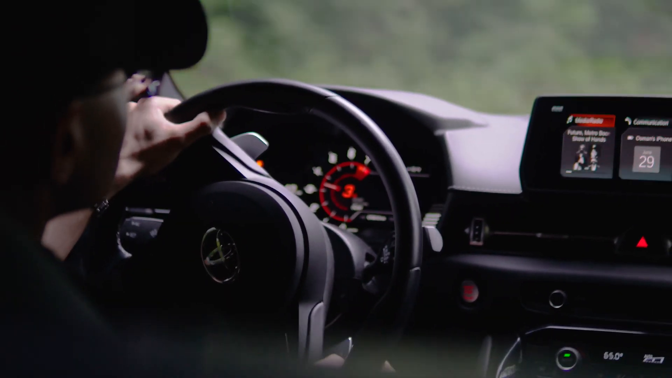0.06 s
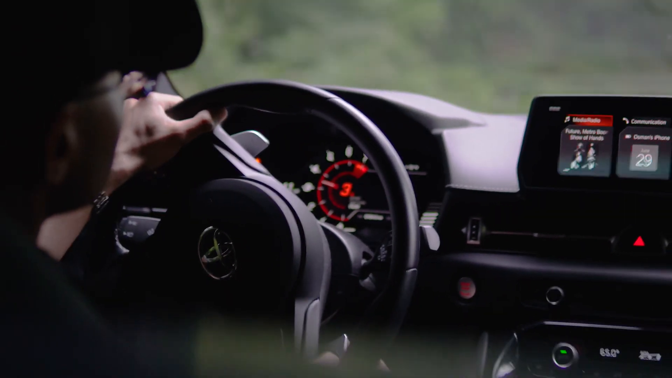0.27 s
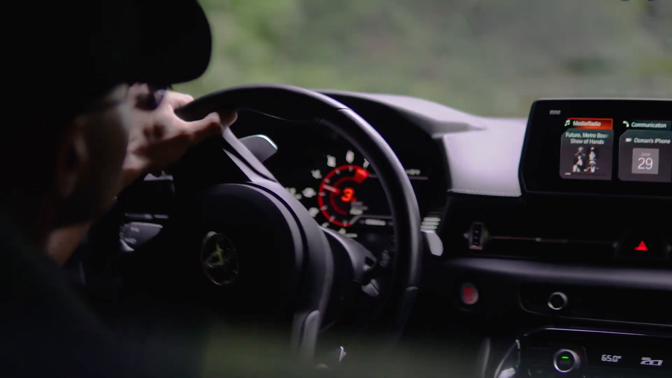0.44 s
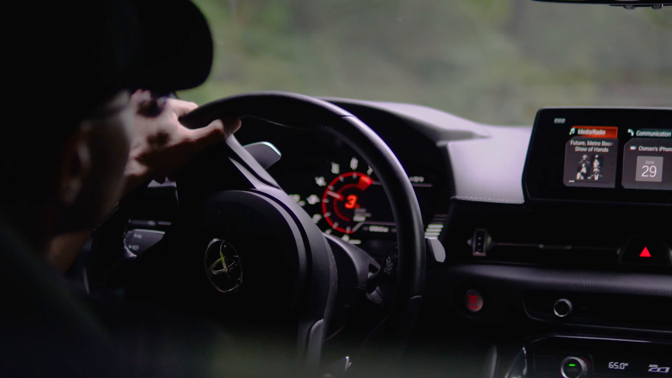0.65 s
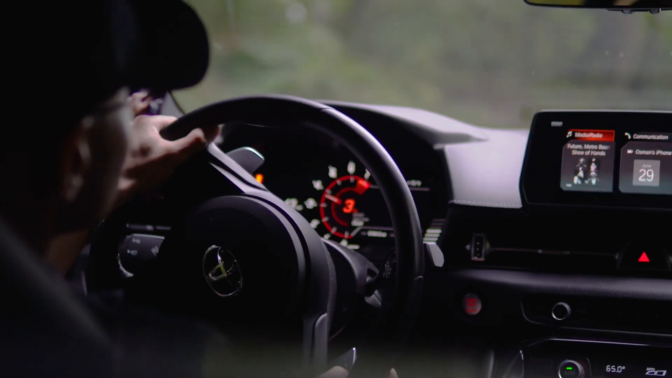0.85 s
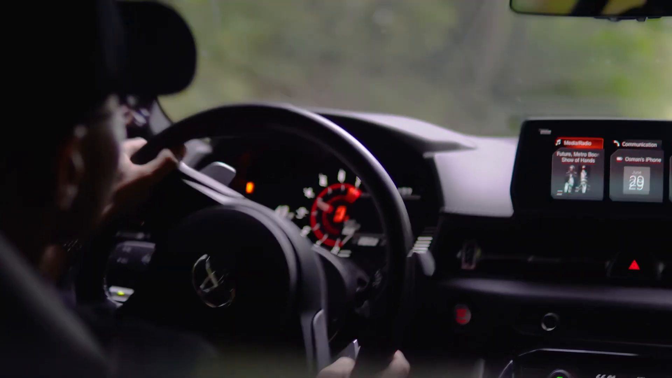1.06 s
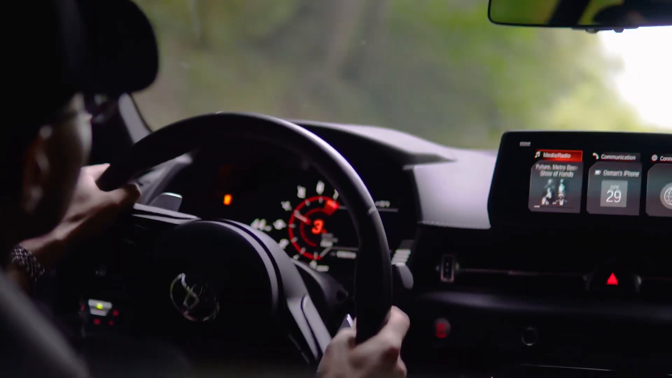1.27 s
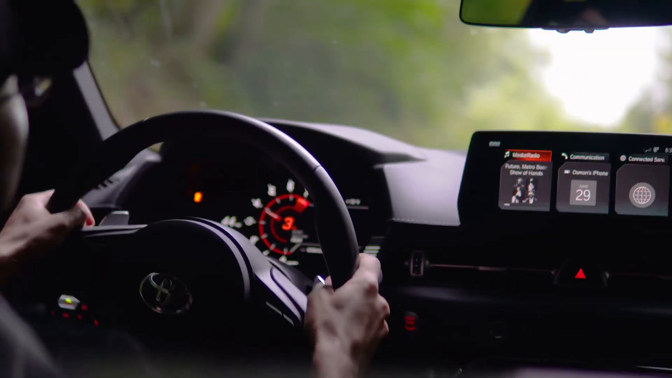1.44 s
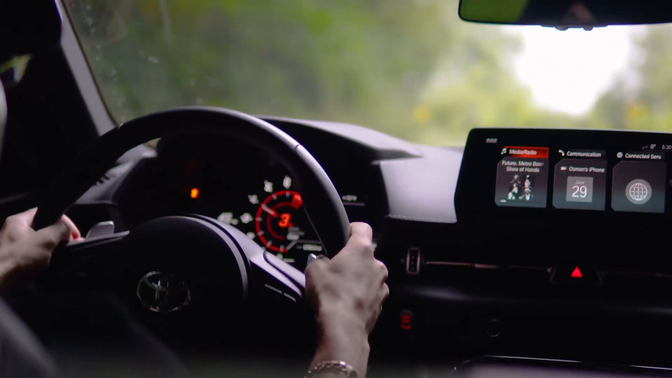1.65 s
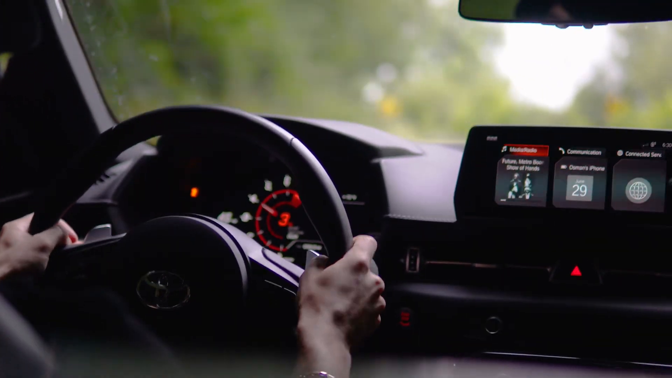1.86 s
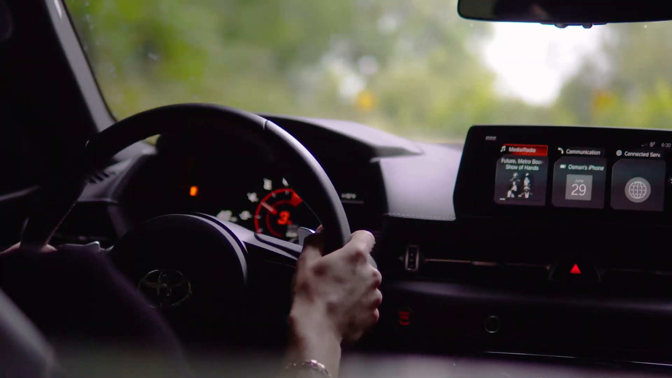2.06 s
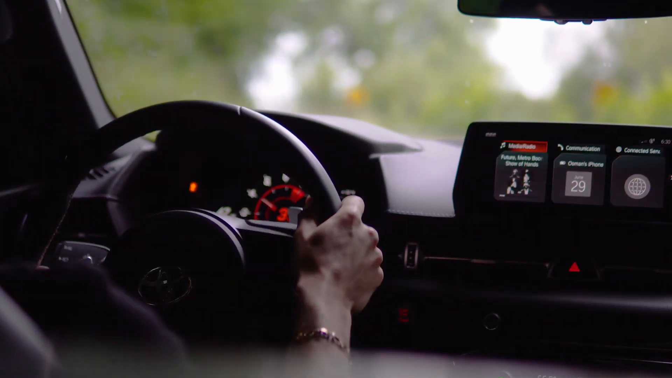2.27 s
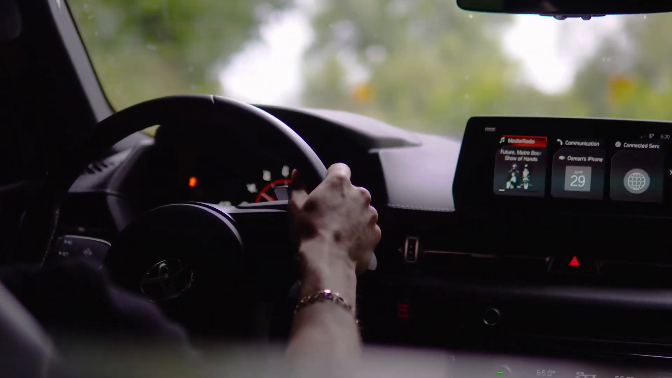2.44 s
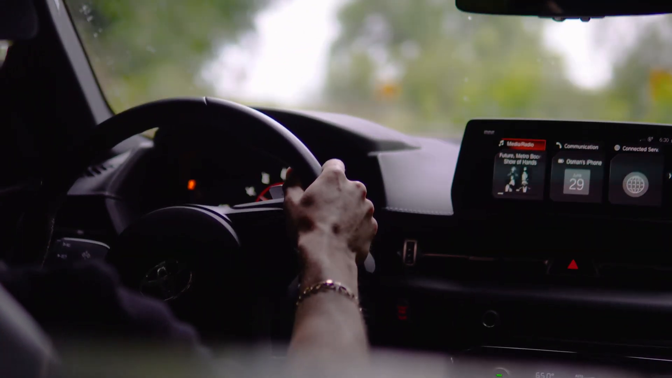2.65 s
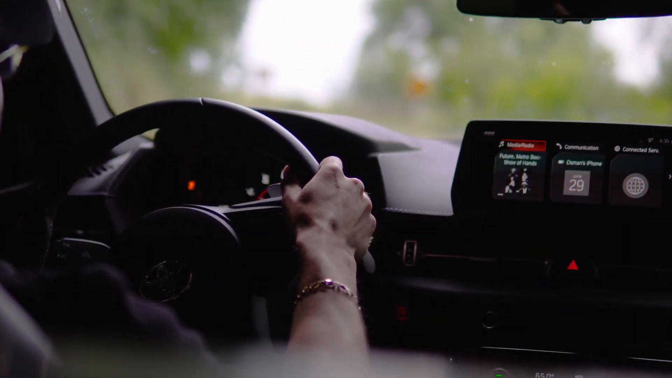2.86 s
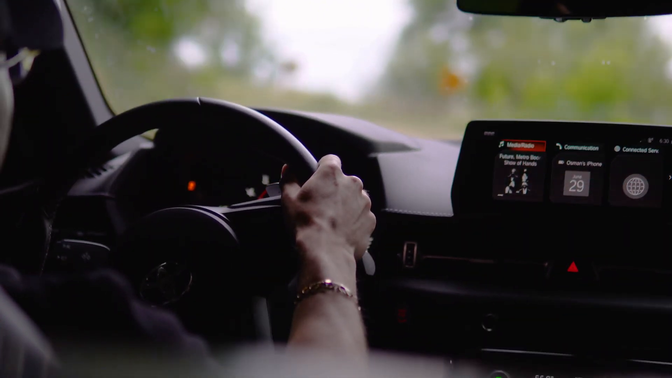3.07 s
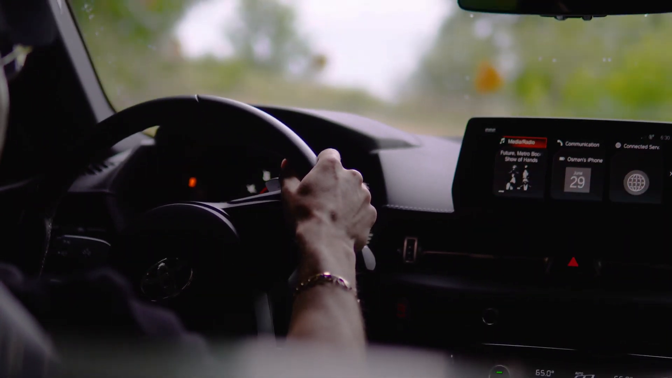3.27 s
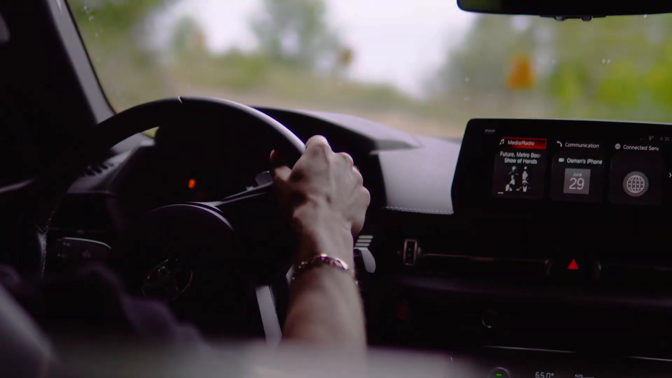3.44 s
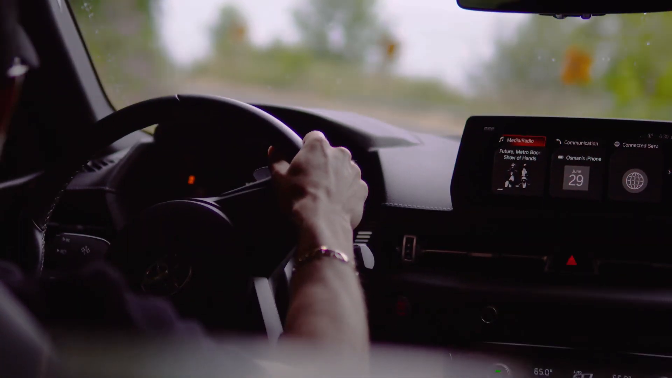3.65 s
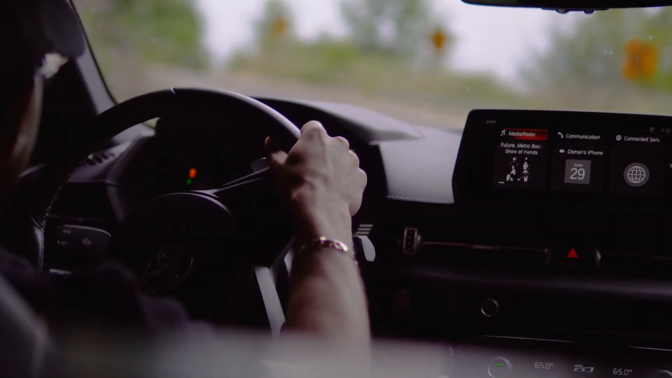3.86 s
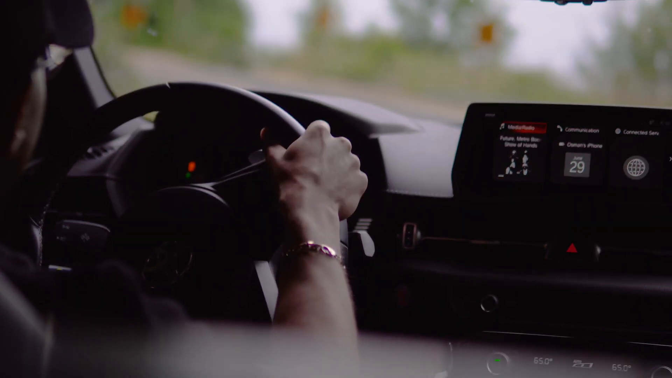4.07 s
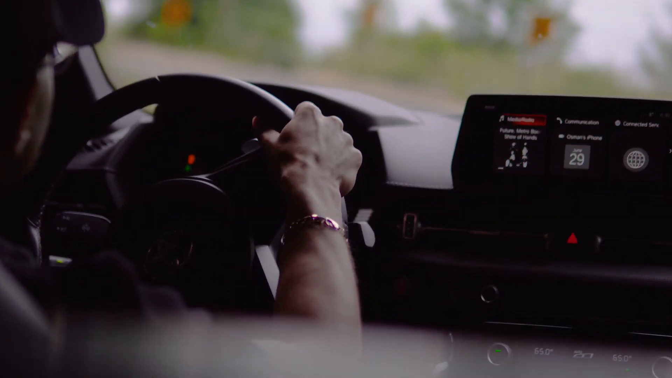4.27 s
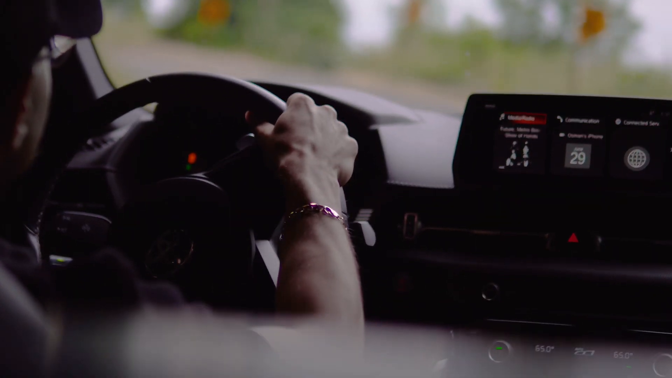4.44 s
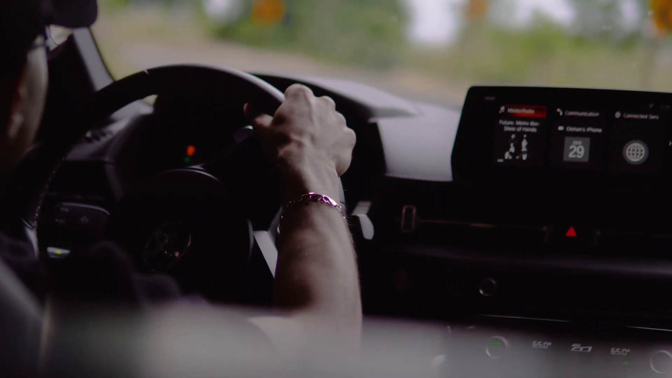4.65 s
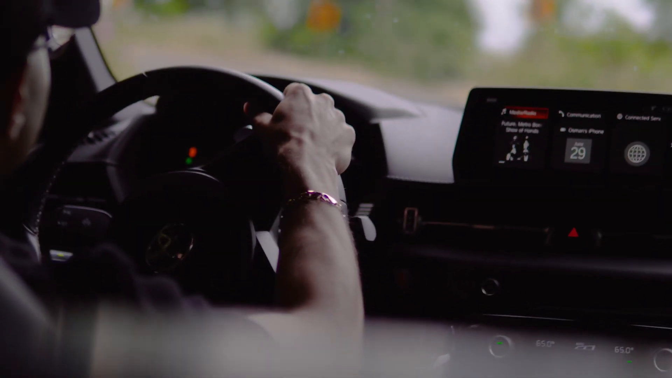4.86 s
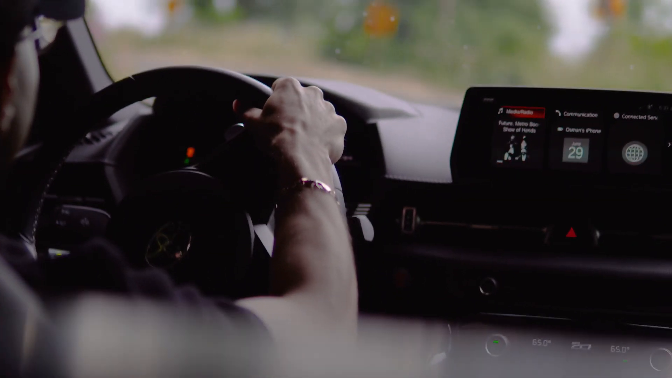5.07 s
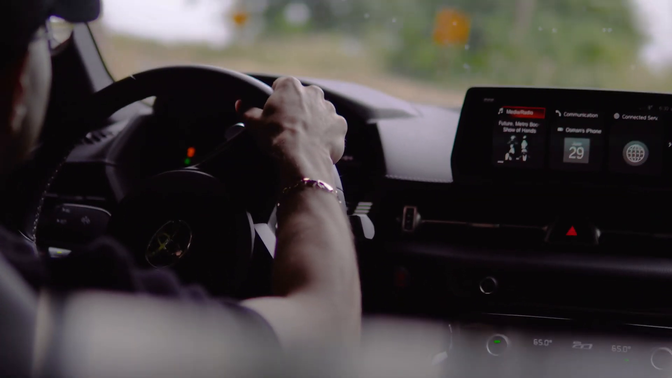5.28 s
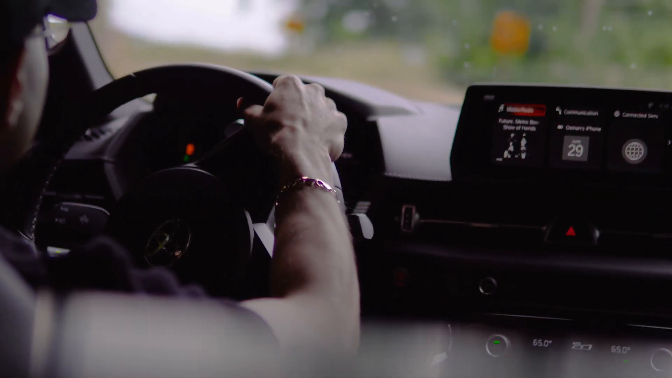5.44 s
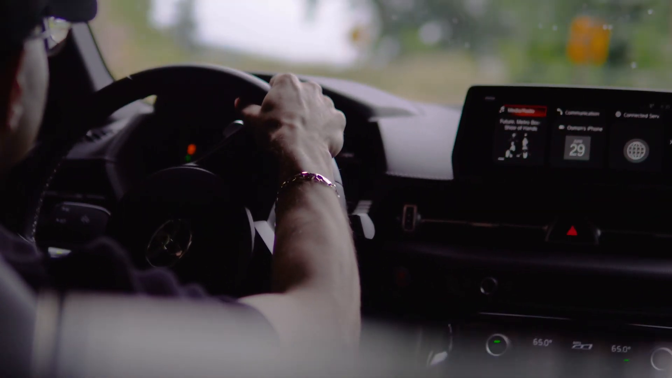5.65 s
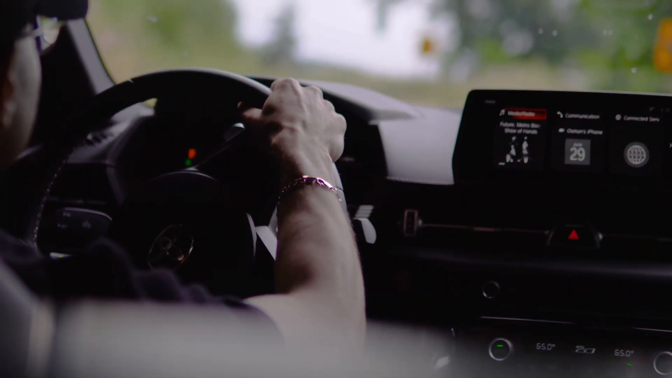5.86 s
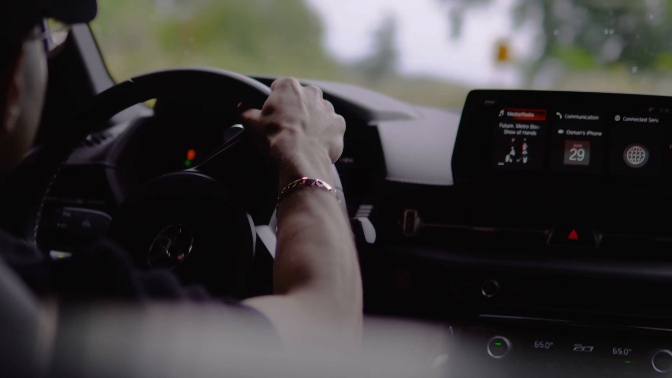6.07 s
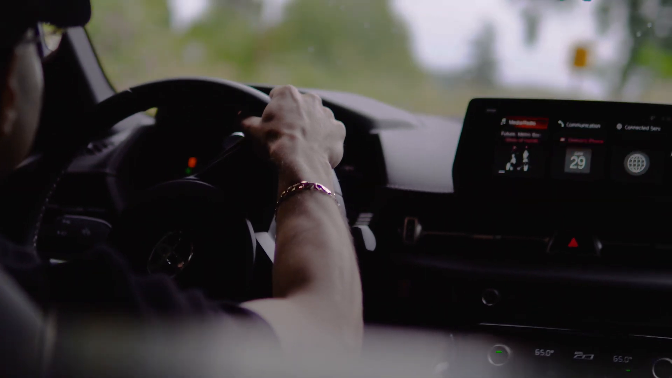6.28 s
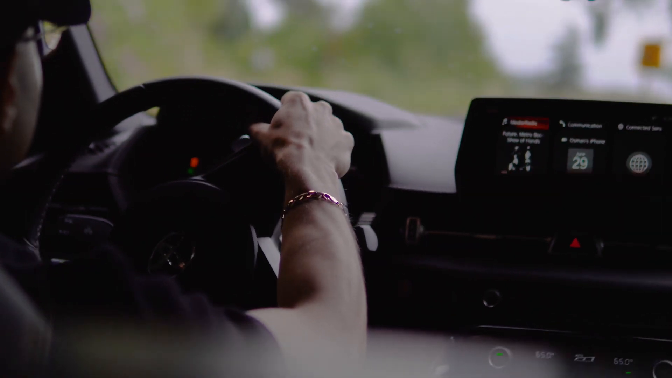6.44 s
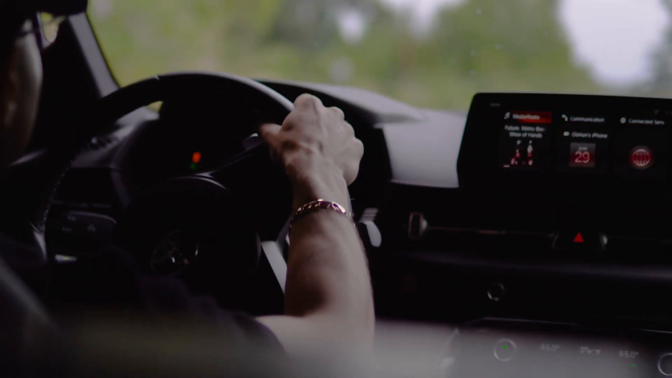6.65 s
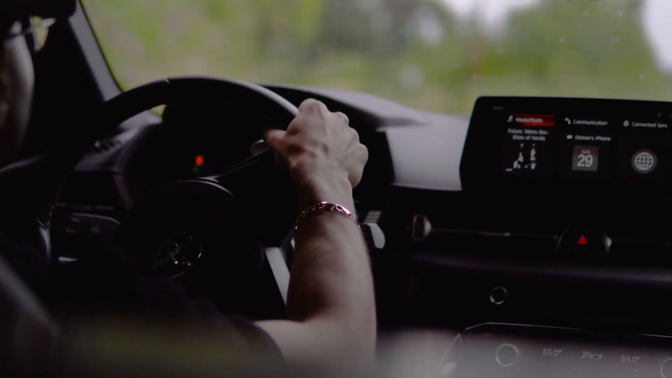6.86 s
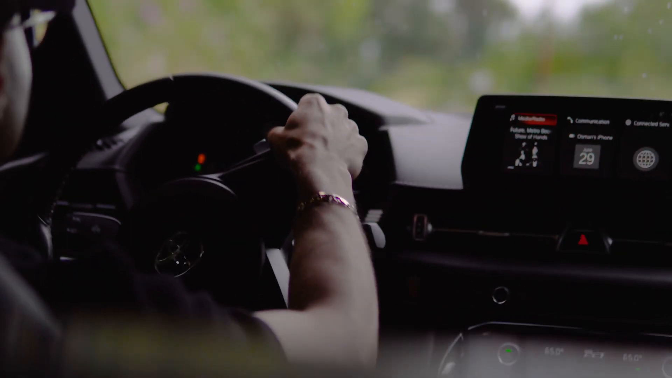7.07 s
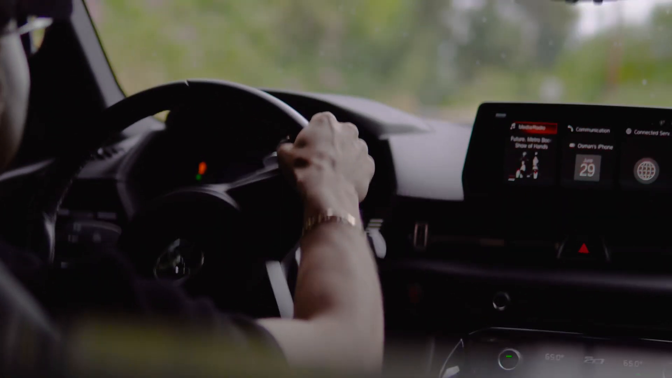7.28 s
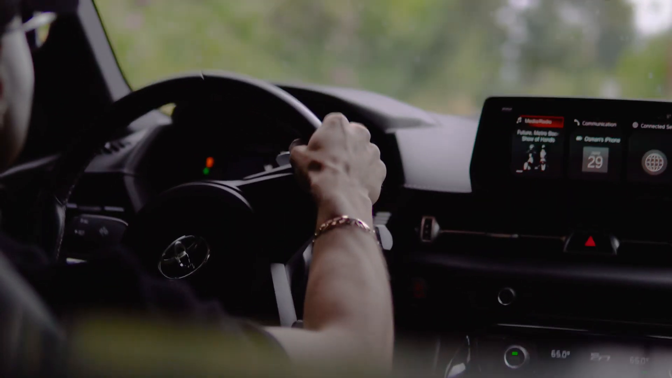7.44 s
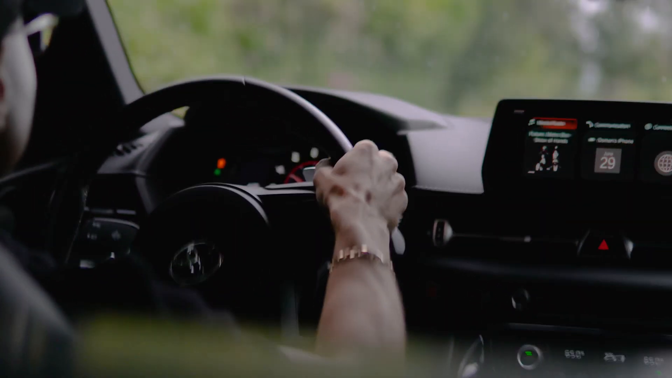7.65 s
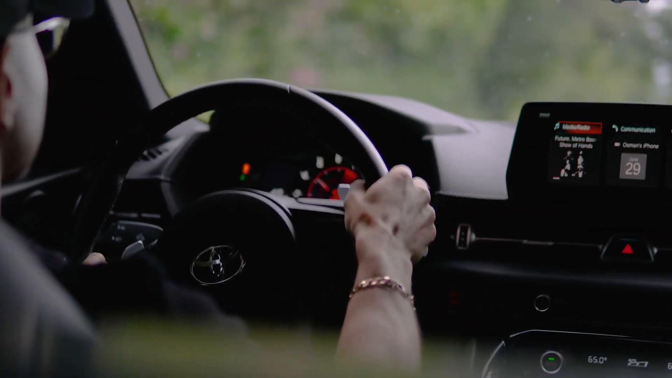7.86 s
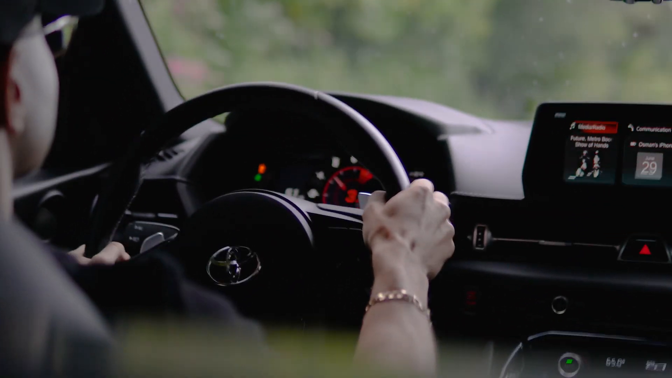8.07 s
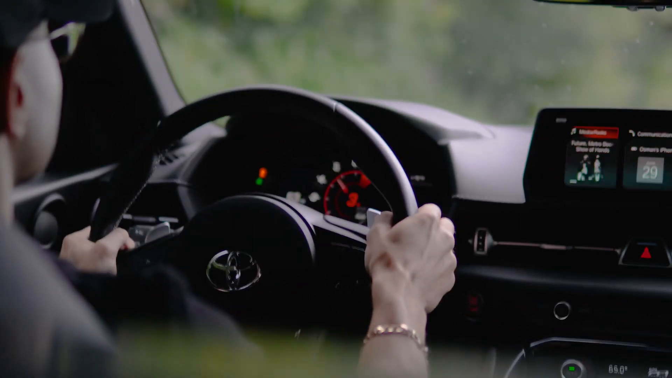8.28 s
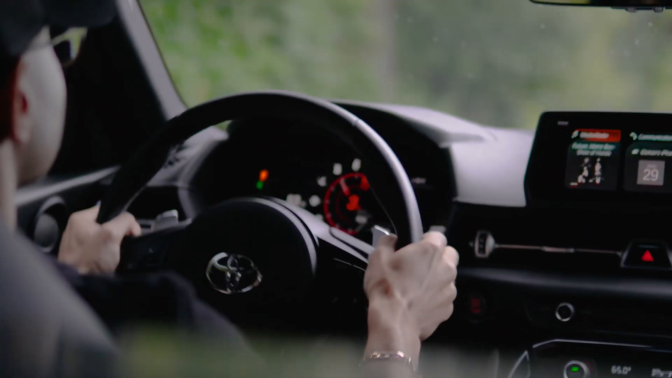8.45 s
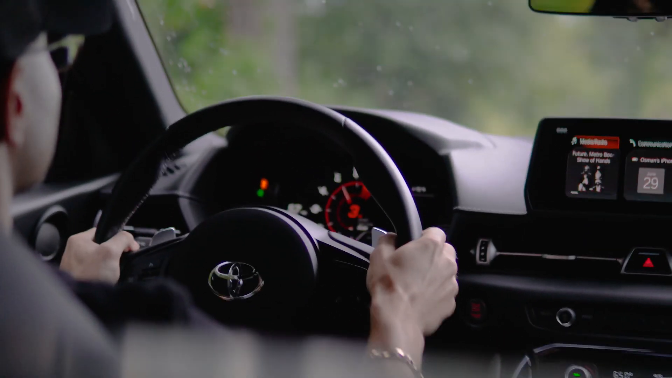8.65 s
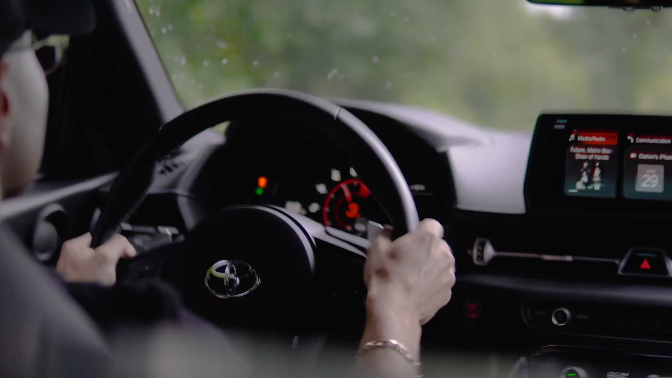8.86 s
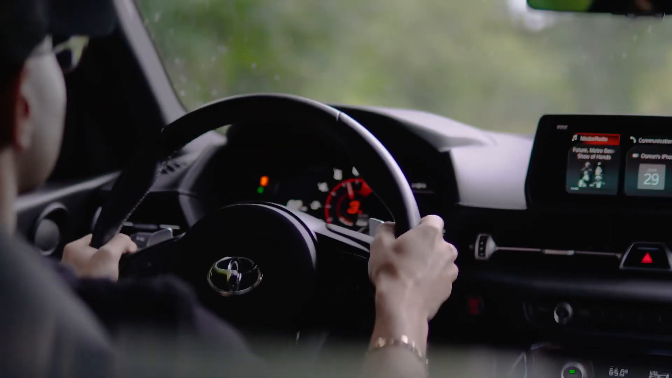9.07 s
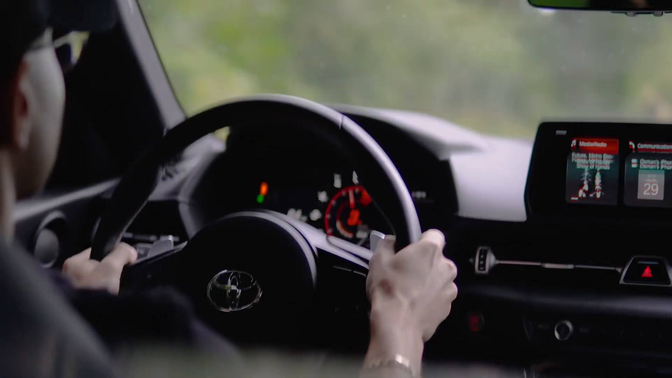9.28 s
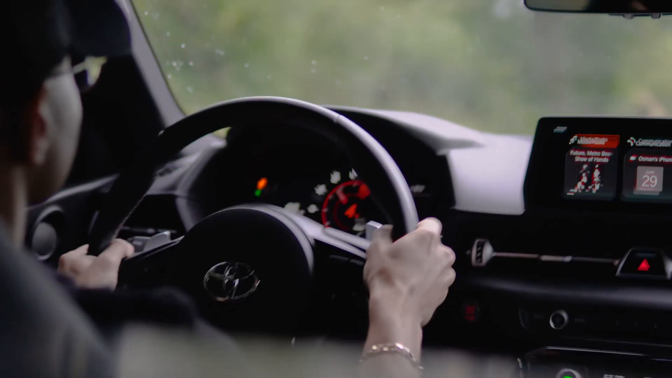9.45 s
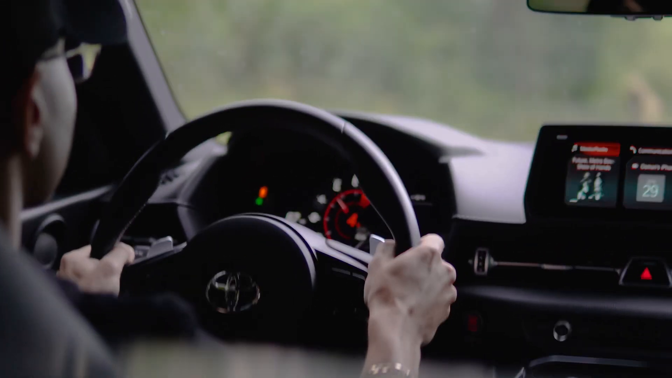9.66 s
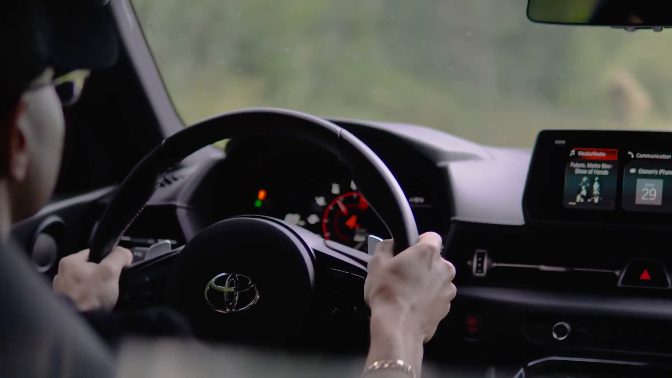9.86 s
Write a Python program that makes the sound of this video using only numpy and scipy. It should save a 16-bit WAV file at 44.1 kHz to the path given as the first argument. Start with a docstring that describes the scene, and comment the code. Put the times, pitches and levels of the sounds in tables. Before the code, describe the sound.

The exhaust note of a sports car drops with an early gear change, pulls evenly, then softens to a low cruising hum with tyre noise underneath. Later the revs climb and the sound opens into a much louder, raspy roar, ending in an upshift with a rapid cluster of pops and lower revs. The microphone sits by the tailpipe as the car drives along a road, with the sound on the left side.

```python
"""On an asphalt road, close to the tailpipe of a turbocharged straight-six sports car (left channel).
Over rolling tyres it shifts up, pulls gently, cruises, then accelerates hard: the exhaust flap opens
and the note turns to a rasping roar. At the next upshift the ignition is cut and unburnt fuel crackles
in the pipe; then the throttle closes. Periodic firing gives the tones, turbulent gas gives the noise,
and the resonances of the pipe colour both."""
import sys
import numpy as np
from scipy import signal
from scipy.fft import rfft, irfft, next_fast_len
from scipy.io import wavfile
from scipy.ndimage import map_coordinates

SR = 44100
rng = np.random.default_rng(int(sys.argv[2]) if len(sys.argv) > 2 else 0)


def int16_out(signal):
    """Quantize to a 16-bit WAV file."""
    q = np.round(np.clip(np.atleast_2d(signal).T, -1, 1) * 32767)
    wavfile.write(sys.argv[1], SR, q.astype(np.int16))


N = 437013

# Tyre noise spectrum. Each row: frequency in Hz, relative density in dB.
TYRE_SPECTRUM = [(15, -68), (25, -30.5), (140, -15), (193, -4), (274, -5.5), (378, 0.5), (445, -13.5),
                 (582, -9), (1340, -16.5), (1750, -28.5), (2300, -20), (3630, -38.5), (5140, -42),
                 (12200, -58.5), (15500, -88)]
# Brief whistling resonances near 3 kHz at high revs.
# Each row: centre in seconds, pitch in Hz, half length in seconds, level in dB.
HIGH_WHISTLES = [(8.8, 3280, 0.074, -41.5), (9.032, 2767, 0.27, -37), (9.302, 3170, 0.088, -35),
                 (9.692, 3150, 0.082, -40.5)]
# Crankshaft speed. Each row: time in seconds, turns per second.
CRANK_SPEED = [(0, 87.5), (.112, 77.6), (.216, 67.2), (.32, 60), (.5, 61.5), (1.07, 63.4), (1.15, 64.9),
               (1.56, 65.25), (1.85, 67.1), (2.35, 67.7), (4.05, 63.75), (4.85, 64.5), (5.35, 64.25),
               (6.3, 62.65), (6.8, 64.25), (7.1, 66.3), (7.7, 71.7), (8.25, 80.7), (8.55, 84.6), (8.85, 90),
               (9.01, 91.1), (9.35, 97.9), (9.44, 96.5), (9.57, 77.4), (9.66, 79.6), (9.78, 76.6)]
# The driver's foot. Each row: time in seconds, load from 0 (coasting) to 1 (pulling hard).
ENGINE_LOAD = [(.33, 0.61), (.8, .78), (1.9, 0.92), (2.3, 0.62), (2.45, 0.3), (2.78, 0), (3.35, 0.22),
               (3.55, 0.0049), (3.95, 0.069), (4.35, 0.43), (5.28, 0.51), (5.52, 0.22), (6.37, 0.37),
               (6.53, 0.67), (7.1, 0.97), (7.6, 0.98), (7.72, 0.84), (7.9, 0.88), (9.72, 0.99), (9.8, 0.47),
               (9.91, 0.36)]
# The exhaust flap. Each row: time in seconds, opening from 0 to 1.
FLAP_OPENING = [(.06, 0.31), (.1, 0.06), (6.8, 0.01), (7.16, 0.07), (7.29, 0.37), (7.5, 0.45), (7.75, 0.45),
                (8.03, 0.92), (8.3, 0.99), (9.55, 1), (9.6, 0.79), (9.64, 0.94), (9.72, 0.94), (9.8, 0.48)]
# Upshifts. Each row: ignition cut in seconds, bite of the next gear in seconds, cut in dB, surge in dB.
UPSHIFTS = [(0.076, 0.201, -3, 5.5), (9.461, 9.553, -9, 0.5)]
# Spectra of the exhaust noises; gas and bark have one with the flap shut and one with it open.
# Each row: frequency in Hz, relative density in dB.
RASP_SPECTRUM = [(1200, -10.5), (2400, 8), (3600, 2), (4300, 3.5), (5500, -1), (6900, -2.5), (8000, -9),
                 (9500, -10), (10500, -13.5), (15500, -19.5)]
GAS_SHUT_SPECTRUM = [(30, -19), (60, -5), (90, -5.5), (130, 0), (260, 3.5), (350, 9), (470, 5), (650, 11.5),
                     (880, 13), (1120, 7.5), (1450, -14.5), (2200, -38.5)]
GAS_OPEN_SPECTRUM = [(35, -44), (80, -4), (150, 4.5), (250, 7), (360, 10.5), (450, 4.5), (620, 13.5),
                     (800, 15), (1000, 13.5), (1400, 1.5), (2200, -37.5)]
BARK_SHUT_SPECTRUM = [(900, -8.5), (1350, 1.5), (1700, 1.5), (1950, -6), (2200, -4.5), (2420, 1.5),
                      (2750, -6), (3150, -1.5), (3350, -12), (3550, -19), (5000, -45)]
BARK_OPEN_SPECTRUM = [(900, -12.5), (1350, -1.5), (1800, 2), (2050, -10.5), (2420, 2.5), (2750, 1.5),
                      (3000, -2), (3230, -4.5), (3450, -1), (3700, -21), (5000, -43.5)]
# Pipe modes rung by a pop. Each row: frequency in Hz, relative level in dB, 60 dB decay time in seconds.
PIPE_MODES = [(94, -17.5, 0.021), (385, -4, 0.017), (750, 5.5, 0.0086), (1060, -6, 0.0065),
              (2610, -10.5, 0.012)]
# Peaks and notches of the exhaust. Each row: centre in Hz, width in Hz, gain in dB.
EXHAUST_RESONANCES = [(251, 87, 4.5), (445, 47, -18), (532.5, 15, 4.5), (589, 49, 3.5), (624, 94, 2),
                      (700, 59, -10), (761, 97, 7.5), (914, 40, 9)]
# Lines from unequal cylinders. Each row: multiple of the four-stroke cycle rate, then relative levels
# in dB when cruising, when pulling and with the flap open.
CYLINDER_LINES = [(2, -25, -29.5, -24.5), (3, -25, -24, -17), (4, -26.5, -10.5, -19),
                  (7, -15, -12.5, -34.5), (8, -25.5, -16.5, -15.5), (9, -27, -14.5, -18.5),
                  (10, -12.5, -12, -27), (14, -13.5, -23, -12), (15, -28, -19, -24), (16, -7, -17.5, -7),
                  (17, -15, -12, -21), (19, -24, -11.5, -18), (21, -19, -12.5, -15.5),
                  (22, -14, -24, -15.5), (23, -18.5, -8, -9), (24, -6.5, -10, -13), (25, -43, -21, -16),
                  (26, -8, 1.5, -17), (27, -24.5, -14, -35), (28, -2.5, -12.5, -14.5),
                  (29, -12.5, -23.5, -29), (30, -19, -29, -16.5), (32, -12.5, -12.5, -17.5),
                  (34, -13, -19, -31), (36, -12.5, -24, -28)]
# Exhaust strength. Each row: load from 0 to 1, then gains in dB of growl (and gas), bark and rasp.
EXHAUST_GAINS = [(0, -54.5, -60.5, -71), (.25, -48.5, -60.5, -69.5), (.5, -44.5, -56.5, -71),
                 (.75, -40, -52, -67), (1, -38.5, -47.5, -63)]
# The strong tones. Each row: load from 0 to 1, then gains in dB of firing note, octave, twelfth and drone.
NOTE_GAINS = [(0, -57.5, -50, -57.5, -56), (.25, -43.5, -40.5, -56.5, -56.5),
              (.5, -38.5, -41, -49.5, -53.5), (.75, -37, -38.5, -44.5, -39), (1, -33, -40.5, -47.5, -35.5)]

# What the open flap adds to those gains, in the same order.
EXHAUST_FLAP_DB, NOTE_FLAP_DB = (13, 18.5, 27.5), (9.7, 10.1, 18.6, 1)
TIME = np.arange(N) / SR


def amp(db):
    """The decibel law: 20 dB is a factor of ten in amplitude."""
    return 10 ** (np.asarray(db) / 20)


def unit(x):
    """Normalisation to an rms of 1."""
    return x / np.sqrt(np.mean(x ** 2) + 1e-20)


def curve(rows):
    """Linear interpolation of (time, value) rows at every sample."""
    return np.interp(TIME, *np.transpose(rows))


def wobble(rate):
    """Slow random modulation: a spline through rate Gaussian knots a second."""
    knots = rng.standard_normal(int(N * rate / SR) + 4)
    return map_coordinates(knots, [np.arange(N) * rate / SR], mode="nearest")


def filtered(x, response):
    """Linear filtering: the spectrum of x is multiplied by a frequency response."""
    size = next_fast_len(N + 8192)
    return irfft(rfft(x, size) * response(np.fft.rfftfreq(size, 1 / SR)), size)[..., :N]


def noise(spectrum, gate=1):
    """Source and filter: gated white noise is coloured by a spectrum and scaled to rms 1."""
    points_hz, db = np.transpose(spectrum)
    source = gate * rng.standard_normal(N)
    return unit(filtered(source, lambda hz: amp(np.interp(np.log(hz + 1), np.log(points_hz), db))))


def partial(angle):
    """Simple harmonic motion of rms 1, with a random starting phase."""
    return np.sqrt(2) * np.sin(angle + rng.uniform(0, 2 * np.pi))


def peak(hz, centre_hz, width_hz):
    """The Lorentzian resonance curve, 1 at its centre."""
    return 1 / (1 + (2 * (hz - centre_hz) / width_hz) ** 2)


def puffs(crank, depth_db, uneven_db, scatter_db):
    """Amplitude modulation: one pulse per firing, three a turn, each of another size."""
    stroke = np.cos(crank) + np.cos(crank / 2)
    return amp(uneven_db * stroke - depth_db * np.cos(3 * crank) + scatter_db * wobble(400))


def gains_at(by_load, flap_db, load, flap):
    """Gains add in decibels: each layer has one set by the load and one by the flap."""
    loads, *columns = np.transpose(by_load)
    return [np.interp(load, loads, column) + flap * db for column, db in zip(columns, flap_db)]


def tyres(level_db, rumble_hz):
    """Rolling contact with asphalt gives broadband noise, lumpy in the bass and smooth above."""
    roll = noise(TYRE_SPECTRUM)
    rumble = filtered(roll, lambda hz: 1 / (1 + (hz / rumble_hz) ** 4))
    return amp(level_db) * (roll + rumble * (amp(1.8 * wobble(16)) - 1))


def valve_ticks(crank, level_db, ring_hz, width_hz):
    """Impact excitation: the valve gear ticks in one narrow resonance."""
    taps = puffs(crank, depth_db=2, uneven_db=-1, scatter_db=-3) * rng.standard_normal(N)
    return amp(level_db) * unit(filtered(taps, lambda hz: peak(hz, ring_hz, width_hz)))


def high_whistles(width_hz):
    """Narrow-band noise has pitch: brief whistling resonances near 3 kHz at high revs."""
    out = np.zeros(N)
    for centre_s, hz, half_s, db in HIGH_WHISTLES:
        swell = amp(db) * np.exp(-((TIME - centre_s) / half_s) ** 2)
        out += swell * wobble(width_hz) * partial(2 * np.pi * hz * TIME + wobble(width_hz))
    return out


def crackle(start_s, gap_s, slowing_s, count, ring_db, crack_db, crack_t60, attack_s):
    """Impulse response: each pop of unburnt fuel rings the pipe's damped modes and spits a burst of rasp."""
    t = np.arange(SR // 20) / SR
    rings, bursts = np.zeros((2, N))
    for k in range(count):
        # about one pop a crank turn, slowing as the revs fall
        start = round((start_s + k * gap_s + k * (k - 1) / 2 * slowing_s) * SR)
        pop_db = rng.normal(0, 1.8)
        ring = np.zeros(len(t))
        for hz, db, t60 in PIPE_MODES:
            decay = amp(db + rng.normal(0, 1) - 60 * t / t60)
            ring += decay * np.sin(2 * np.pi * hz * rng.normal(1, 0.043) * t)
        rings[start:start + len(t)] -= amp(pop_db + ring_db) * ring * (1 - np.exp(-t / attack_s))
        bursts[start:start + len(t)] += amp(pop_db + crack_db - 60 * t / crack_t60)
    return rings + bursts * noise(RASP_SPECTRUM)


def overrun(crank, crank_hz, load, level_db, swell_db, pipe_hz, width_hz, order=11):
    """Resonance: off the throttle one crank order sings out where it meets a narrow mode of the pipe."""
    tone_db = level_db + swell_db * peak(order * crank_hz, pipe_hz, width_hz)
    return amp(tone_db) * (1 - load) * partial(order * crank)


def rasp(crank, flap, shut_db, open_db, muffle_hz):
    """Jet noise: gas tears at the lip of the pipe; with the flap shut the silencer is a low-pass filter."""
    bright = noise(RASP_SPECTRUM, puffs(crank, depth_db=1.5, uneven_db=-0.25, scatter_db=.9))
    dull = filtered(bright, lambda hz: 1 / np.sqrt(1 + (hz / muffle_hz) ** 4))
    level_db = shut_db + flap * (open_db - shut_db) + 0.54 * wobble(35)
    return amp(level_db) * (dull + flap * (bright - dull))


def bark(crank, flap, shut_db, open_db, half_open_db):
    """Formants: puffs of gas ring the upper resonances of the tailpipe."""
    gate = puffs(crank, depth_db=5, uneven_db=0.86, scatter_db=1.5)
    silenced = amp(shut_db) * (1 - flap) * noise(BARK_SHUT_SPECTRUM, gate)
    direct = amp(open_db) * np.sqrt(flap) * noise(BARK_OPEN_SPECTRUM, gate)
    # a half-open flap stands in the gas and makes it bark more
    return amp(half_open_db * np.sin(np.pi * flap)) * (silenced + direct)


def gas(crank, flap, shut_db, open_db):
    """Turbulence: puffs leave through the silencer, or straight out past the open flap."""
    gate = puffs(crank, depth_db=3, uneven_db=0.5, scatter_db=1.5)
    silenced = amp(shut_db) * (1 - flap) * noise(GAS_SHUT_SPECTRUM, gate)
    direct = amp(open_db) * flap ** 0.9 * noise(GAS_OPEN_SPECTRUM, gate)
    return silenced + direct


def growl(crank, crank_hz, throttle, flap, waver_db, upper_db, fall_db, pipe_hz, width_hz, pipe_db):
    """Half orders: unequal cylinders repeat every two turns, so lines stand between the firing harmonics."""
    out = np.zeros(N)
    for multiple, cruise_db, pull_db, open_db in CYLINDER_LINES:
        order = multiple / 2
        shut_db = cruise_db + throttle * (pull_db - cruise_db)
        # a line swells as it sweeps through the resonance of the open pipe
        swell_db = pipe_db * peak(order * crank_hz, pipe_hz, width_hz)
        line_db = shut_db + flap ** 2 * (open_db + swell_db - shut_db)
        out += amp(line_db + waver_db * wobble(7)) * partial(order * crank)
    # the highest lines waver most and sink when the flap opens
    for step, order in enumerate(range(19, 28)):
        line_db = upper_db - fall_db * step - 7 * flap
        out += amp(line_db + 1.9 * wobble(25)) * partial(order * crank + .5 * wobble(40))
    return out * amp(0.64 * wobble(130))


def note_gains(load, flap, dip_s, dip_half_s, dip_db):
    """Spectral balance follows load and flap; the octave dips briefly as the hard pull begins."""
    note_db, octave_db, twelfth_db, drone_db = gains_at(NOTE_GAINS, NOTE_FLAP_DB, load, flap)
    dip = np.exp(-((TIME - dip_s) / dip_half_s) ** 4)
    return note_db, octave_db + dip_db * dip, twelfth_db, drone_db


def firing_note(crank, crank_hz, gains_db, burble, flutter_db, stumble_db):
    """Forced vibration: three firings a turn give a hum whose partials sweep the exhaust's resonances."""
    out = np.zeros(N)
    for order, db in zip((3, 6, 9, 10), gains_db):  # firing note, octave, twelfth, drone
        swell_db = sum(gain * peak(order * crank_hz, hz, width) for hz, width, gain in EXHAUST_RESONANCES)
        out += amp(db + swell_db + flutter_db * order / 3 * wobble(45)) * partial(order * crank)
    # ragged firing makes the hum stumble
    return out * amp(stumble_db * burble * wobble(16))


def gear_changes(cut_ramp_s, bite_ramp_s, surge_s, settle_s):
    """Transients: the ignition cut drops the level, the next gear surges, and ragged firing settles."""
    drop_db, lift_db, ragged = np.zeros((3, N))
    for cut_s, bite_s, cut_db, surge_db in UPSHIFTS:
        off = np.clip((TIME - cut_s) / cut_ramp_s + .5, 0, 1)
        on = np.clip((TIME - bite_s) / bite_ramp_s + .5, 0, 1)
        drop_db += cut_db * (off - on)
        lift_db += surge_db * on * np.exp(-((TIME - bite_s) / surge_s) ** 4)
        ragged += off * np.exp(-(np.maximum(TIME - bite_s, 0) / settle_s) ** 2)
    return drop_db, lift_db, ragged


def exhaust(crank, crank_hz, load, flap, burble, surge_db):
    """Superposition: tones and pulsed noise share the crank's timing and grow with load and flap."""
    throttle = load ** 2
    growl_db, bark_db, rasp_db = gains_at(EXHAUST_GAINS, EXHAUST_FLAP_DB, load, flap)
    tones_db = note_gains(load, flap, dip_s=6.8, dip_half_s=.36, dip_db=-6)
    note = firing_note(crank, crank_hz, tones_db, burble, flutter_db=0.15, stumble_db=2.5)
    song = overrun(crank, crank_hz, load, level_db=-57.5, swell_db=17.5, pipe_hz=742.7, width_hz=14)
    lines = growl(crank, crank_hz, throttle, flap, waver_db=1.74, upper_db=-21, fall_db=1.25,
                  pipe_hz=780, width_hz=69, pipe_db=4.5)
    # a steady pull burns cleanly: stronger lines, less turbulence
    lines *= amp(growl_db - 2.5 * burble)
    flow = amp(growl_db + 2 * burble - 2 * throttle) * gas(crank, flap, shut_db=-3, open_db=3.5)
    pipe = amp(bark_db) * bark(crank, flap, shut_db=-2, open_db=-1, half_open_db=2.5)
    jet = amp(rasp_db) * rasp(crank, flap, shut_db=0.5, open_db=5, muffle_hz=11000)
    return amp(surge_db) * (note + song + lines + flow + pipe) + jet


def scene():
    """Sound pressures add on the left channel; the right carries only a faint leak and hiss."""
    crank_hz, load, flap = curve(CRANK_SPEED), curve(ENGINE_LOAD), curve(FLAP_OPENING)
    cut_db, surge_db, ragged = gear_changes(cut_ramp_s=.008, bite_ramp_s=.021, surge_s=.096, settle_s=.033)
    # firing is ragged in a shift, off the throttle and with the flap open
    burble = np.clip(ragged + 0.44 * (1 - load) ** 2 + 0.22 * flap, 0, 1)
    crank = 2 * np.pi * np.cumsum(crank_hz * (1 + 0.0013 * wobble(40))) / SR  # angle in radians
    # ragged firings come early or late, which smears the high lines most
    crank += .07 * burble * wobble(70)
    car = amp(cut_db) * exhaust(crank, crank_hz, load, flap, burble, surge_db)
    car += crackle(start_s=9.469, gap_s=.011, slowing_s=0.00017, count=9,
                   ring_db=-7.5, crack_db=-23.5, crack_t60=0.018, attack_s=0.00017)
    car += high_whistles(width_hz=220)
    car += tyres(level_db=-44, rumble_hz=500)
    car += valve_ticks(crank, level_db=-61, ring_hz=2245, width_hz=190)
    hiss = noise([(30, 24), (500, 12), (3000, 5)])
    return np.array([amp(5.5) * car, amp(-62) * car + amp(-83) * hiss])


def record(dry):
    """Soft saturation rounds the highest peaks; band limiting removes the deep bass and extreme treble."""
    ceiling, low_hz, top_hz = .85, 58, 15780
    rounded = dry / (1 + (np.abs(dry) / ceiling) ** 6) ** (1 / 6)
    thinned = signal.sosfilt(signal.butter(2, low_hz, "highpass", fs=SR, output="sos"), rounded)
    fade = signal.windows.tukey(N, .0005)
    return filtered(thinned * fade, lambda hz: hz < top_hz)


dry = scene()
out = record(dry)
int16_out(out)
```